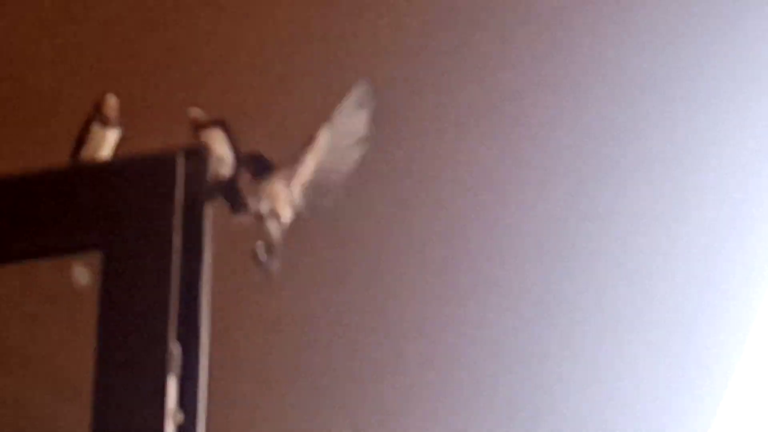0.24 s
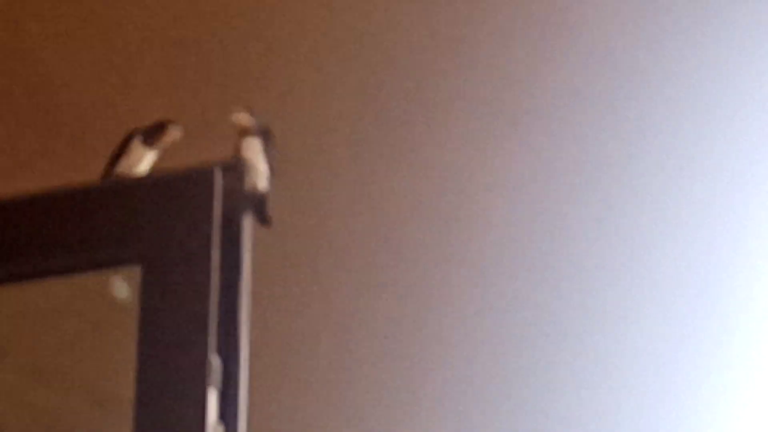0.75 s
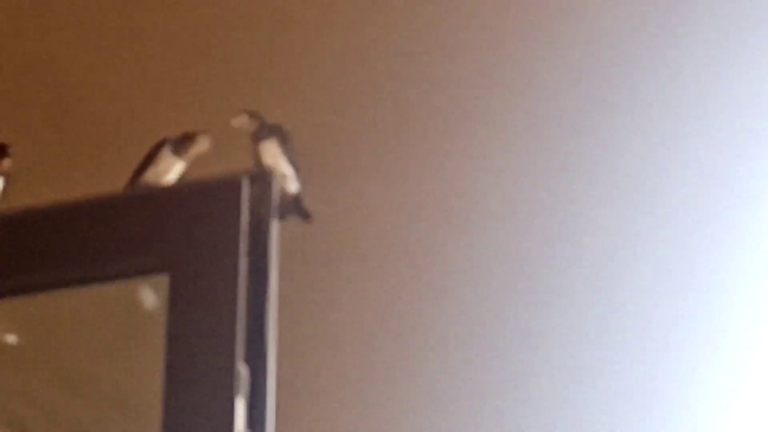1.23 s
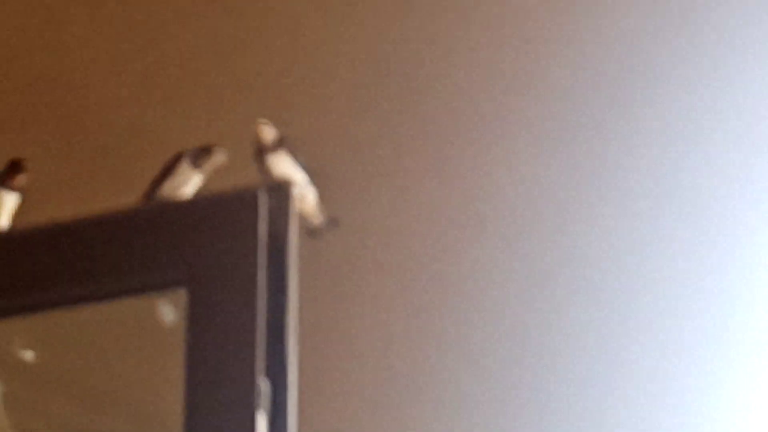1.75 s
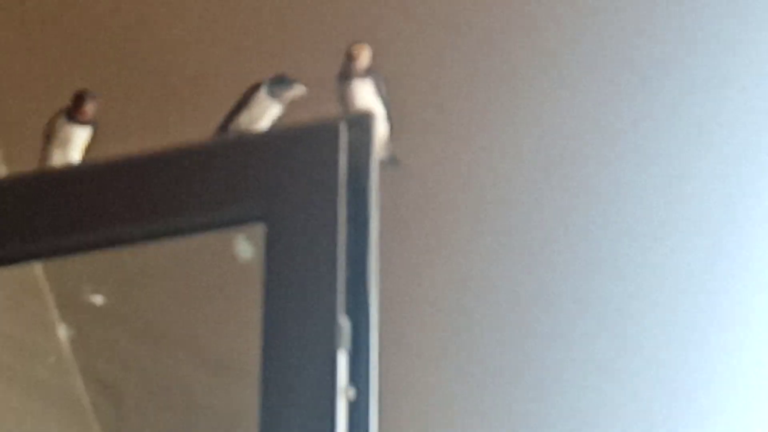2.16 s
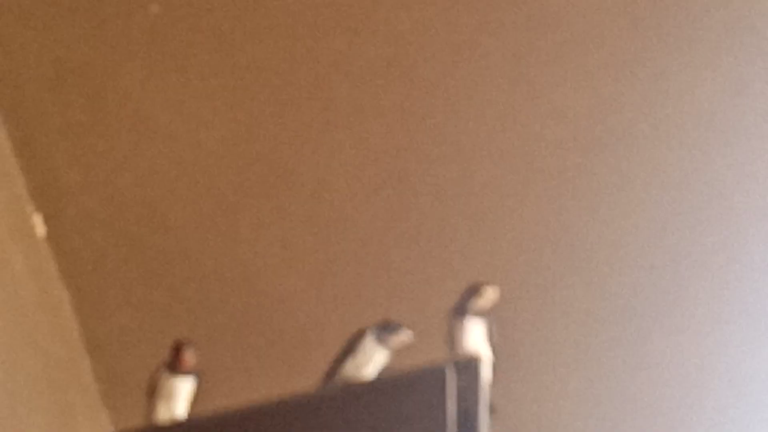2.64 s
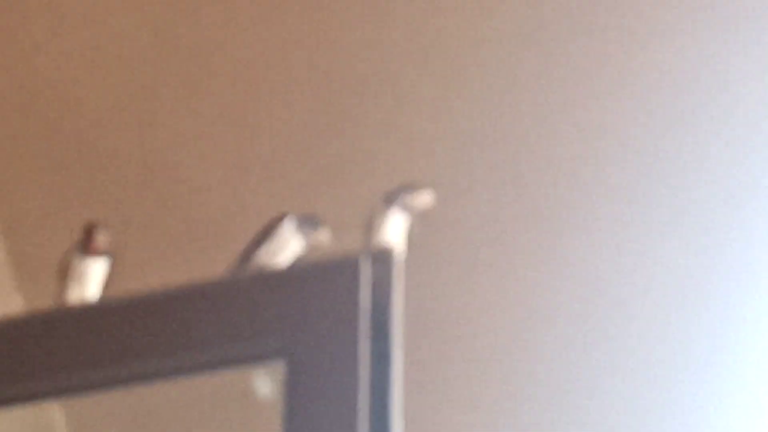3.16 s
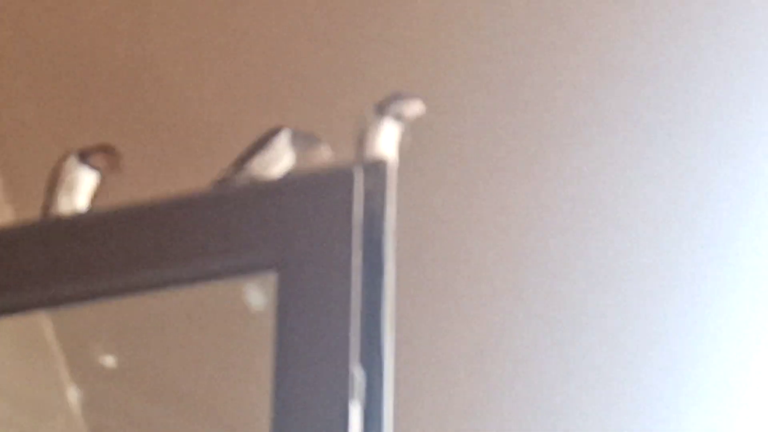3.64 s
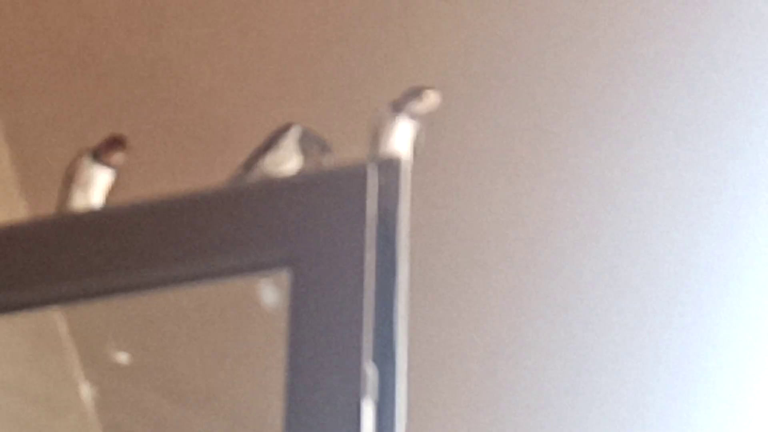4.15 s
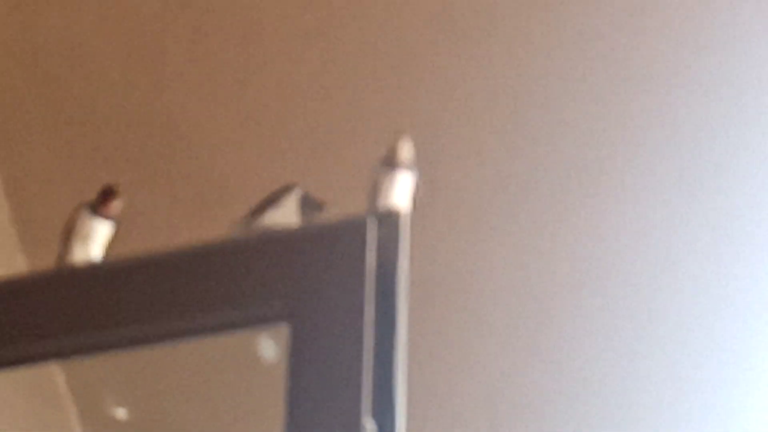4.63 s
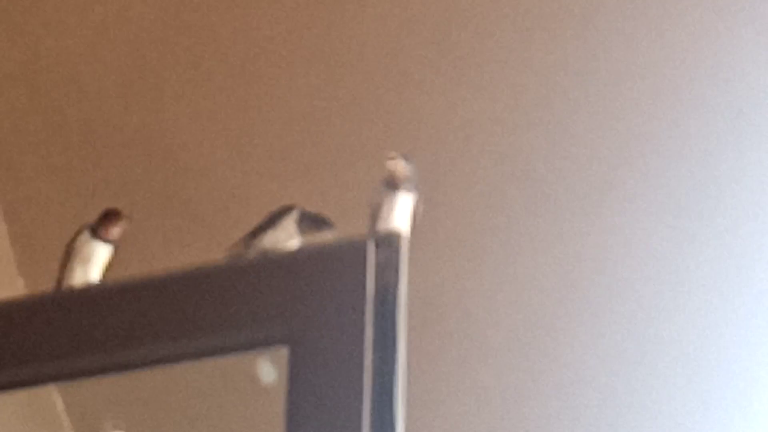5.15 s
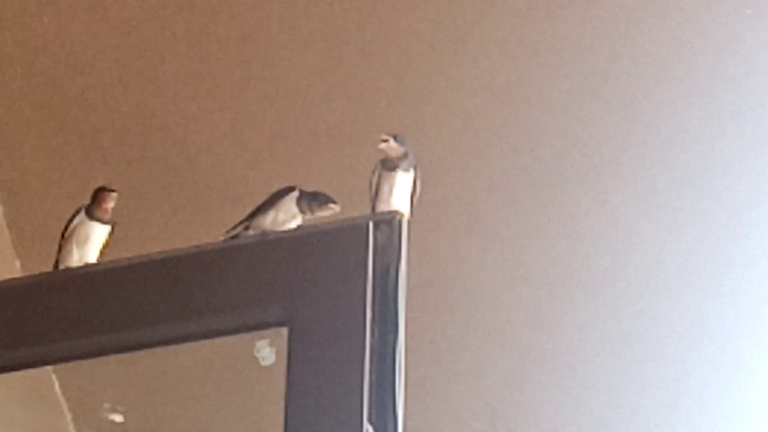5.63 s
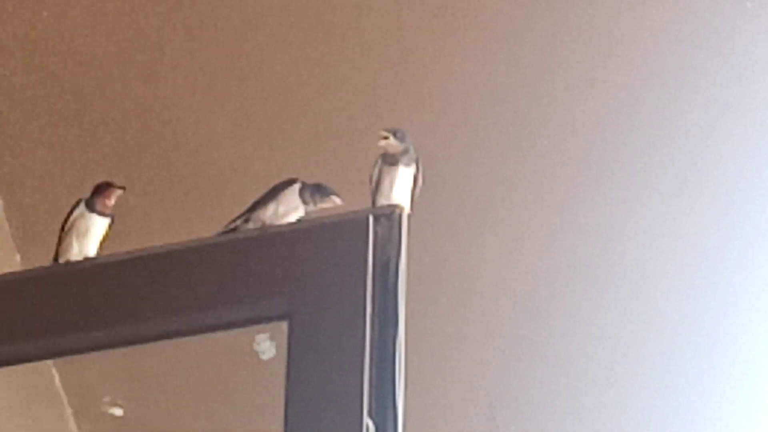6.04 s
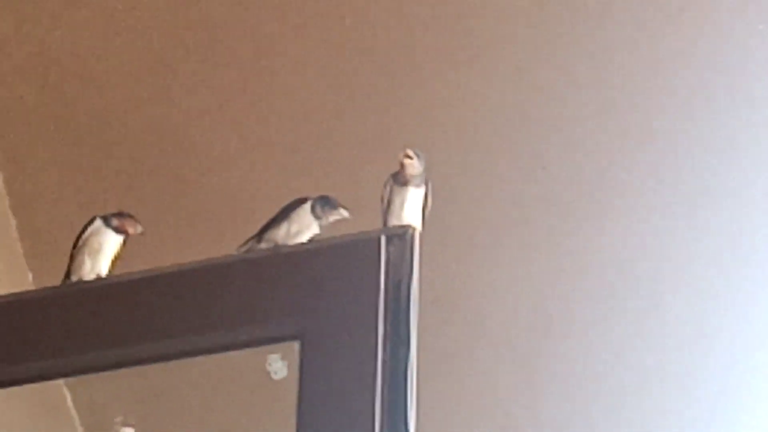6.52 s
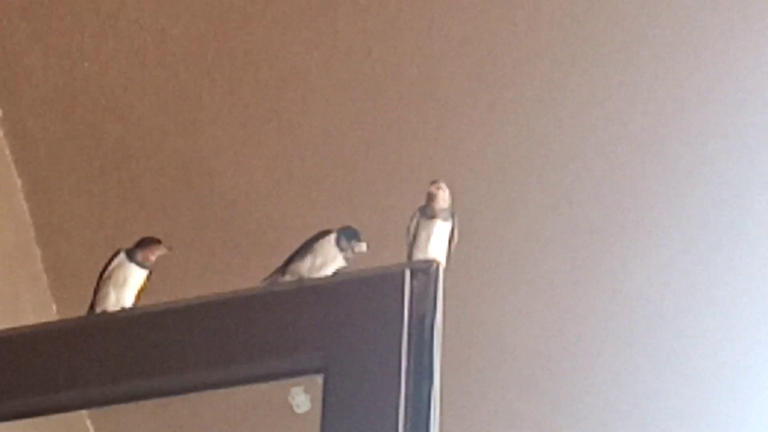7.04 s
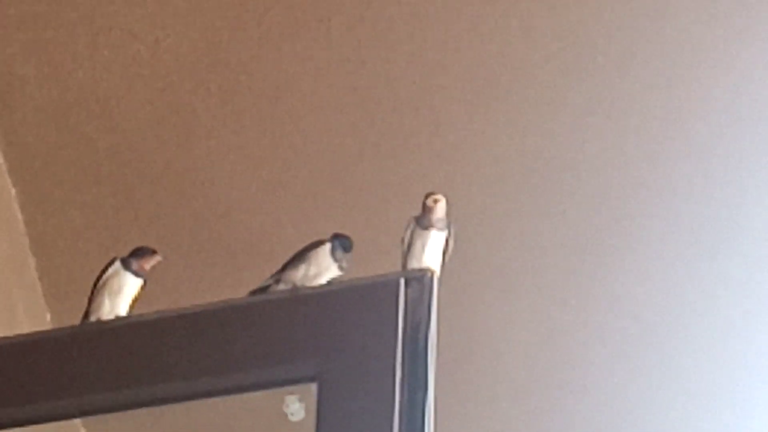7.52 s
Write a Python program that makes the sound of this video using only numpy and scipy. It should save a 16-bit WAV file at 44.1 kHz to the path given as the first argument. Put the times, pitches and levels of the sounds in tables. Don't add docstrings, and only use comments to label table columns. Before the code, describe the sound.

Sharp, hoarse swallow chirps and high begging squeaks grow denser indoors, with fluttering wings, small handling bumps and one loud pop.

```python
import sys
import numpy as np
from scipy import signal
from scipy.fft import rfft, irfft, next_fast_len
from scipy.io import wavfile
from scipy.ndimage import uniform_filter1d, map_coordinates

SR = 44100
rng = np.random.default_rng(int(sys.argv[2]) if len(sys.argv) > 2 else 0)


def volts_from_decibels(level):
    exponent = np.asarray(level, float) / 20
    return 10 ** exponent


def store_wav(level_fs):
    pcm = np.round(np.clip(np.atleast_2d(level_fs), -1, 1) * 32767)
    wavfile.write(sys.argv[1], SR, pcm.T.astype(np.int16))


N = 343098


def unit(x):
    return x / np.sqrt(np.mean(x ** 2) + 1e-20)


def along(points, hz):
    f, v = np.transpose(points)
    return np.interp(np.log(hz + 1), np.log(f + 1), v)


def curves(rows):
    s, *cols = np.transpose(rows)
    return [np.interp(np.arange(N) / SR, s, c) for c in cols]


def wobble(rate):
    knots = rng.standard_normal(int(N * rate / SR) + 4)
    return map_coordinates(knots, [np.arange(N) * rate / SR])


def filtered(x, response):
    m = next_fast_len(N + 8192)
    return irfft(rfft(x, m) * response(np.fft.rfftfreq(m, 1 / SR)), m)[..., :N]


# (f/Hz, likeness)
ALIKENESS = [(60, 1), (300, 0.92), (1000, 0.14), (3000, 0.043), (15000, 0.13)]


def rush(spectrum, patchy_db):
    z = signal.stft(rng.standard_normal((2, N)), nperseg=512)[2]
    field = uniform_filter1d(rng.standard_normal(z.shape[1:]), size=6, axis=0)
    field = uniform_filter1d(field, size=12, axis=1)
    pair = signal.istft(z * volts_from_decibels(patchy_db * unit(field)), nperseg=512)[1][:, :N]

    def mid_side(hz):
        turn = np.arccos(np.clip(along(ALIKENESS, hz), -1, 1)) / 2
        return volts_from_decibels(along(spectrum, hz)) * [np.cos(turn), np.sin(turn)]

    mid, side = filtered(pair, mid_side)
    return unit(np.array([mid + side, mid - side]))


# (t/s, rumble level/dB, street level/dB, hiss level/dB)
AIR_LEVELS = [(0.0, -59.5, -54.5, -55.5), (1.8, -60.5, -64.5, -55.5), (7.78, -60.5, -63, -58)]
# (f/Hz, level/dB per Hz)
RUMBLE_COLOUR = [(25, -85), (57, -9), (156, -2), (265, -7.5), (328, -10), (420, -14.5), (550, -51),
                 (920, -120)]
STREET_COLOUR = [(160, -22), (280, 1), (600, -4.5), (1250, -6), (2000, -3), (2800, -24), (3640, -29),
                 (6160, -120)]
HISS_COLOUR = [(1500, -22), (2300, 2.5), (4000, -2.5), (6400, -1), (8500, -10.5), (12000, -22.5),
               (16000, -29.5)]


def air():
    rumble_db, street_db, hiss_db = curves(AIR_LEVELS)
    rumble = volts_from_decibels(rumble_db + 6 + 0.66 * wobble(7)) * rush(RUMBLE_COLOUR, patchy_db=1.0)
    street = volts_from_decibels(street_db + 11) * rush(STREET_COLOUR, patchy_db=1.43)
    hiss = volts_from_decibels(hiss_db + 5) * rush(HISS_COLOUR, patchy_db=3.5)
    return rumble + street + hiss


# (f/Hz, fall time t/s)
ROOM_DECAY = [(1500, .4), (4000, .33), (7000, .27), (14000, .15)]


def room(x):
    hz, t, z = signal.stft(rng.standard_normal((2, SR // 2)), SR, nperseg=256)
    fading = volts_from_decibels(-60 * t / along(ROOM_DECAY, hz)[:, None])
    tail = signal.istft(z * fading, SR, nperseg=256)[1]
    delayed = np.pad(x, (90, 0))[None]
    return signal.fftconvolve(delayed, tail / np.linalg.norm(tail[0]), axes=1)[:, :N]


# (t/s, level/dB, f/Hz)
FAR_CALLS = [(0.0, -81, 1840), (0.19, -63, 1970), (2.17, -57, 2010), (2.23, -51.5, 2040), (2.6, -69, 2030),
             (2.71, -53, 1960), (3.07, -63.5, 2040), (3.18, -49.5, 1860), (3.68, -70, 2050),
             (4.12, -52.5, 1980), (5.03, -66.5, 1960), (5.39, -48.5, 1940), (5.85, -70.5, 2030),
             (5.94, -48.5, 2120), (6.26, -60.5, 2000), (6.3, -51, 1980), (7.69, -62, 1940),
             (7.78, -71, 2040)]


def far_birds():
    level_db, hz = curves(FAR_CALLS)
    upper = .035 + .03 * wobble(12) + .05 * wobble(250)
    lower = -.03 + .035 * wobble(9) + .05 * wobble(150)
    sway = np.array([upper, lower])
    strength = volts_from_decibels([3.7 * wobble(14), 3.5 * wobble(12) - 2.5])
    calls = np.sin(2 * np.pi * np.cumsum(hz * (1 + sway), axis=1) / SR) * strength
    return volts_from_decibels(level_db + 7) * unit(room(calls.sum(axis=0)))


def swell(s, rise, t60):
    at = np.arange(max(round(s * SR) - 4410, 0), min(round(s * SR) + 26460, N))
    t = at / SR - s
    growth = 1 / np.cosh(t / rise)
    decay = volts_from_decibels(-60 * (np.hypot(t, rise / 2) - rise / 2) / t60)
    return at, np.where(t < 0, growth, decay)


# (t/s, peak level/dB, swell t/s, fall by 60 dB t/s, cloth level/dB)
WING_BEATS = [(0.0513, -35.5, 0.00068, 0.13, -7), (0.123, -46, 0.0054, 0.13, -16),
              (0.197, -40, 0.0023, 0.11, -16), (.98, -54, 0.005, .15, 7), (1.08, -52, 0.013, 1, 2.5),
              (1.5, -50.5, .004, .15, -12), (1.8, -58.5, 0.022, 0.96, 10.5), (2.545, -55.5, 0.0043, 0.3, 4),
              (2.669, -42.5, 0.018, 0.89, 6), (2.87, -61, 0.027, 0.61, 12.5),
              (2.98, -46.5, 0.0011, 0.097, -11), (3.085, -53.5, 0.0015, 0.4, -7),
              (7.055, -35.5, 0.0064, 0.55, -28)]
# (f/Hz, level/dB per Hz)
FEATHER_COLOUR = [(900, -41), (1500, 1), (2700, -6), (4000, 5), (7000, 6.5), (9000, -1), (12000, -10.5),
                  (16000, -18)]
CLOTH_COLOUR = [(100, -39), (200, 4), (450, 4), (900, 0.5), (1300, -4), (2700, -3.5), (4000, -29)]


def flaps():
    feather = rush(FEATHER_COLOUR, patchy_db=1.1) * volts_from_decibels(3.5 * wobble(500))
    cloth = rush(CLOTH_COLOUR, patchy_db=-2.5)
    out = np.zeros((2, N))
    for s, db, rise, t60, dull_db in WING_BEATS:
        at, shape = swell(s, rise, t60)
        out[:, at] += volts_from_decibels(db) * shape * (feather[:, at] + volts_from_decibels(dull_db) * cloth[:, at])
    return out


# (end t/s, length t/s, start f/Hz, end f/Hz, level/dB)
FAINT_WHISTLES = [(1.75, .05, 1380, 1504, -48.5), (.375, 0.016, 5300, 5460, -55),
                  (2.365, 0.061, 2800, 3380, -52), (3.238, .018, 3560, 4000, -46),
                  (3.612, 0.022, 3950, 4280, -41), (3.635, .029, 3340, 3620, -49),
                  (3.809, 0.053, 2710, 3440, -47), (3.836, 0.033, 4390, 5660, -39),
                  (3.837, 0.023, 5900, 7140, -40), (3.886, .015, 3300, 3510, -38),
                  (4.072, .012, 3110, 3195, -44), (4.589, 0.046, 2410, 3620, -48),
                  (5.043, .013, 4420, 4850, -45), (5.085, 0.051, 2800, 3550, -45),
                  (5.8, .012, 5190, 5870, -36), (6.783, .039, 3190, 4060, -41),
                  (7.267, .027, 5430, 6740, -42.5), (7.392, .02, 3244, 3460, -47.5),
                  (7.4, 0.013, 4300, 4530, -51), (7.645, .017, 4820, 5900, -44),
                  (7.736, .012, 3400, 3540, -45)]
# (end t/s, length t/s, top f/Hz, whistle level/dB, rasp level/dB)
CHIRP_NOTES = [(.307, 0.053, 4440, -45, -42.5), (.546, .03, 4666, -32, -23),
               (1.25, 0.041, 4290, -49, -40.5), (1.86, 0.056, 4300, -53.5, -52),
               (2.405, 0.064, 4280, -44, -37.5), (3.226, 0.027, 4354, -39.5, -34.5),
               (3.84, 0.033, 4434, -34.5, -34), (3.892, 0.032, 4535, -36.5, -26),
               (4.011, .045, 4370, -37.5, -29), (4.078, 0.043, 4267, -36.5, -33),
               (4.181, 0.037, 4210, -41, -34), (4.572, .05, 4320, -40.5, -31.5),
               (4.992, .04, 4785, -34.5, -26.5), (5.107, .028, 4460, -36, -25.5),
               (5.813, 0.033, 4640, -35, -24), (5.959, 0.031, 4524, -36.5, -27.5),
               (6.275, 0.02, 4200, -39, -41), (6.771, 0.045, 4774, -34.5, -25),
               (6.886, 0.054, 4680, -37.5, -28), (7.069, 0.023, 4320, -42.5, -34),
               (7.157, 0.024, 4410, -43, -27), (7.264, 0.029, 4360, -49.5, -28.5),
               (7.667, 0.04, 4650, -34, -24.5), (7.776, 0.034, 4500, -39.5, -29)]
DUET_NOTES = [
    (2.094, 0.059, 3760, -40.5, -42),
    (4.64, .05, 3626, -36.5, -29),
    (6.635, 0.059, 3760, -51.5, -38),
    (7.477, 0.027, 3700, -55, -47),
]
PIP_NOTES = [
    (.485, .018, 4420, -32.5, -42),
    (3.63, .045, 5020, -41, -33.5),
    (3.726, .015, 4770, -43.5, -38),
    (3.768, .018, 5300, -46, -40),
    (4.525, .024, 5140, -34.5, -36),
]
BEG_NOTES = [(.479, 0.014, 5850, -40, -30.5), (.8, 0.045, 6140, -58.5, -54),
             (3.843, .016, 6220, -39.5, -47), (4.515, .021, 6320, -41.5, -29.5),
             (4.6, 0.023, 6500, -45, -32.5), (5.222, 0.03, 6490, -36, -25.5),
             (5.322, 0.044, 6630, -38, -26.5), (5.428, 0.027, 6464, -36, -31),
             (6.171, .027, 6380, -41, -25), (6.29, 0.017, 6510, -41.5, -29),
             (7.388, 0.026, 6770, -35, -29.5)]
# (ends later by t/s, share of length,
# start f and end f as multiples of the top f, level/dB)
CHIRP_VOICES = [(-.001, .82, .75, 1.01, 0.2), (.002, .8, .61, .78, -6.5), (-.021, 1.1, .69, .74, -10.5),
                (-.008, .65, 1.08, 1.24, -15.5), (-.004, .7, 1.3, 1.62, -19), (-0.015, 0.97, 1.2, 1.3, -17),
                (.001, .45, 1.6, 1.95, -17)]
DUET_VOICES = [
    (0, 1, .84, 1.01, -1.4),
    (-.004, 1, 1.16, 1.33, -3.5),
    (.002, .8, 2.15, 2.25, -16),
]
PIP_VOICES = [
    (0, 0.84, .92, 1.01, 0.5),
    (0.017, 1.1, .66, .715, -15),
    (-0.018, 1.5, 1.42, 1.6, -16),
]
BEG_VOICES = [(-.002, .85, .945, 1.01, 0.4), (-.012, 0.87, .9, .95, -1), (.001, .6, .72, .76, -9.5),
              (.002, .7, 1.2, 1.28, -11), (.002, 0.8, 1.1, 1.12, -11), (.004, 0.74, .5, .52, -20)]
SCATTER_DB, SCATTER_PITCH = 3, 0.01524


def strokes():
    out = list(FAINT_WHISTLES)
    kinds = [(CHIRP_NOTES, CHIRP_VOICES), (DUET_NOTES, DUET_VOICES),
             (PIP_NOTES, PIP_VOICES), (BEG_NOTES, BEG_VOICES)]
    for notes, voices in kinds:
        chance = rng.standard_normal((len(notes), len(voices), 2))
        for (end, length, top_hz, db, _), row in zip(notes, chance):
            for (delay, share, start, stop, voice_db), (a, b) in zip(voices, row):
                weak = voice_db < -2
                start_hz = top_hz * start * (1 + SCATTER_PITCH * a)
                end_hz = top_hz * stop * (1 + SCATTER_PITCH * a * weak)
                level_db = db + voice_db + SCATTER_DB * b * weak
                out.append((end + delay, max(share * length, .008), start_hz, end_hz, level_db))
    return out


def whistles():
    out, tremble, flutter = np.zeros(N), wobble(500), wobble(260)
    for end, length, start_hz, end_hz, db in strokes():
        at = np.arange(round((end - length) * SR) - 90, min(round(end * SR) + 330, N))
        left = np.hypot(np.maximum(end - at / SR, 0), .003) - .003
        climb = np.sin(np.pi / 2 * left / left[0]) ** 1.3
        hz = (end_hz + (start_hz - end_hz) * climb) * (1 + .007 * tremble[at])
        shape = np.abs(np.sin(np.pi * np.linspace(0, 1, len(at)) ** 1.7)) ** .9
        tone = np.sin(2 * np.pi * np.cumsum(hz) / SR)
        out[at] += volts_from_decibels(db + 5.5 + 3.2 * flutter[at]) * shape * tone
    return out


def slips(count, centre_hz, spread_hz, climb):
    place, pitch, size = rng.random(count), rng.standard_normal(count), rng.standard_normal(count)
    t = np.arange(-154, 154) / SR
    start_hz = centre_hz + spread_hz * pitch[:, None]
    squeak = np.hanning(len(t)) * np.sin(2 * np.pi * (start_hz * t + climb * t ** 2 / 2))
    at = (place * N).astype(int)[:, None] + np.arange(len(t))
    loud_squeak = volts_from_decibels(3 * size[:, None]) * squeak
    return unit(np.bincount(at.ravel(), loud_squeak.ravel(), N)[:N])


# (f/Hz, level/dB per Hz)
BEAK_COLOUR = [(1800, -13), (2600, -4.5), (3400, -9.5), (5000, 0.5), (7500, -8), (9500, -9), (12000, -15.5),
               (16000, -20.5)]
RASP_AHEAD_S, RASP_SWELL_S = 0.012, 0.019
BREATH_AHEAD_S, BREATH_DB, BREATH_SWELL_S = 0.057, -13, 0.0097


def rasp():
    beat = 1 + 0.82 * np.sin(2 * np.pi * np.cumsum(1050 * (1 + .12 * wobble(60))) / SR)
    breath = beat * rng.standard_normal(N) * volts_from_decibels(1.5 * wobble(220))
    hiss = unit(filtered(breath, lambda hz: volts_from_decibels(along(BEAK_COLOUR, hz))))
    effort = np.zeros(N)
    puffs = [(RASP_AHEAD_S, RASP_SWELL_S, 0), (BREATH_AHEAD_S, BREATH_SWELL_S, BREATH_DB)]
    for end, *_, db in list(CHIRP_NOTES) + list(DUET_NOTES) + list(PIP_NOTES) + list(BEG_NOTES):
        for ahead, rise, part_db in puffs:
            at, shape = swell(end - ahead, rise, t60=0.038)
            effort[at] += volts_from_decibels(db + part_db - 11.0) * shape
    high = slips(count=3500, centre_hz=6250, spread_hz=650, climb=90000)
    low = slips(count=2000, centre_hz=3900, spread_hz=600, climb=80000)
    return effort * (high + .45 * low + .55 * hiss)


# (t/s, level/dB, f/Hz)
FINGER_BUMPS = [
    (1.27, -44, 240),
    (1.775, -46, 320),
    (1.815, -41, 266),
    (1.845, -47, 450),
    (1.88, -41, 290),
    (2.919, -39, 74.5),
    (3.411, -35.5, 192),
]


def bumps():
    out, t = np.zeros(N), np.arange(4410) / SR
    for s, db, hz in FINGER_BUMPS:
        ring = volts_from_decibels(db + 2.5 - 60 * t / 0.053) * np.sin(2 * np.pi * hz * t)
        out[round(s * SR):][:len(t)] += ring
    return out


# (t/s, step level/dB)
POP_STEP = (5.5382, -3.5)


def pop():
    s, db = POP_STEP
    jolt = volts_from_decibels(db) * (np.arange(N) >= round(s * SR))
    for order, hz, kind in [(2, 68, "highpass"), (2, 44, "highpass"), (1, 84, "highpass"), (3, 6500, "lowpass")]:
        jolt = signal.sosfilt(signal.butter(order, hz, kind, fs=SR, output="sos"), jolt)
    return jolt


def later(x, count):
    return np.pad(x, (max(count, 0), max(-count, 0)))[max(-count, 0):][:N]


# (t/s, gain)
NEAR_ECHOES = [
    [(.0021, .5), (.0083, .4)],
    [(.0034, .4), (.0112, .35)],
]


def scene():
    birds = whistles() + rasp()
    near = np.array([sum(gain * later(birds, round(s * SR)) for s, gain in port) for port in NEAR_ECHOES])
    walls = volts_from_decibels(-3) * room(birds)
    return birds + near + walls + flaps() + bumps() + far_birds() + air()


def band_limit(x):
    return signal.sosfilt(signal.butter(12, 16810, fs=SR, output="sos"), x)


# (f/Hz, left minus right level/dB)
PORT_BALANCE = [(60, -14), (110, 1), (200, -4.5), (380, -3), (700, -2), (1290, -4.5), (2380, -5),
                (4400, -5), (8120, -10), (15000, -67)]
# (f/Hz, level/dB)
MIC_RESPONSE = [(12500, -1), (13500, 3), (13900, -13), (14400, 14.5), (15200, 9.5), (15550, 19.5),
                (15800, -30), (16800, -45)]
LEAD = 48


def record(dry):
    def ports(hz):
        balance = volts_from_decibels(along(PORT_BALANCE, hz))
        share = np.array([balance, hz * 0 + 1]) / np.sqrt(1 + balance ** 2)
        return share * volts_from_decibels(along(MIC_RESPONSE, hz))

    left, right = filtered(dry, ports)
    jolt = pop()
    mix = np.array([later(left, -LEAD) + jolt, right + 0.0076 * jolt])
    return band_limit(mix)


dry = scene()
out = record(dry)
store_wav(out)
```